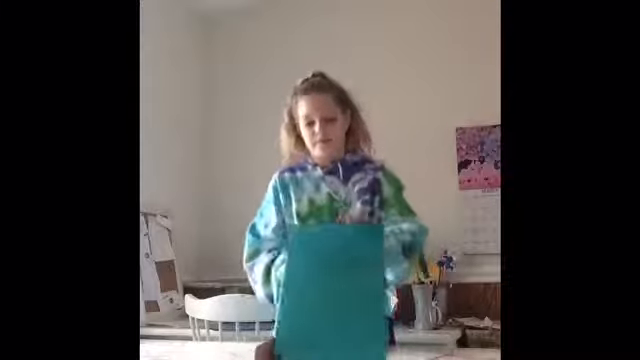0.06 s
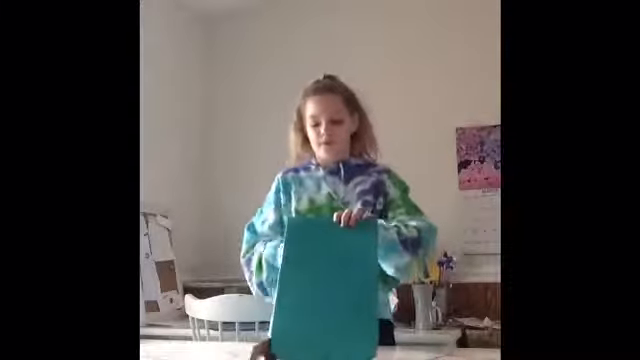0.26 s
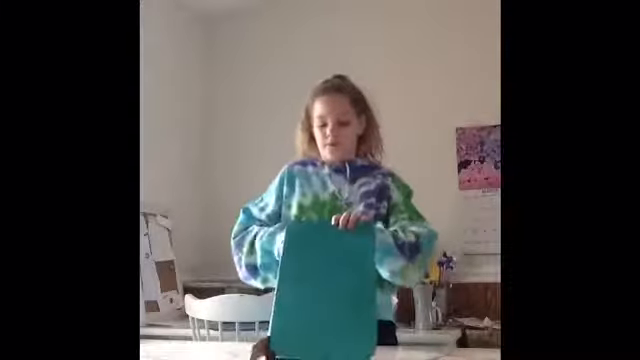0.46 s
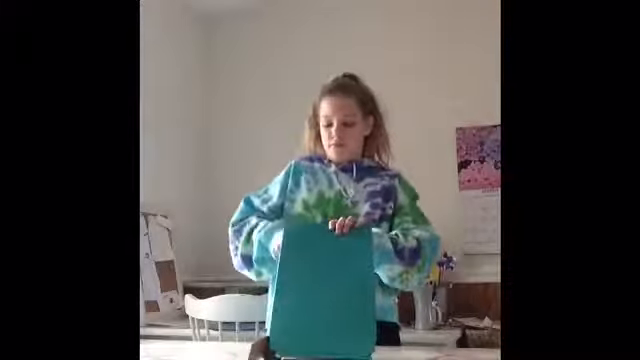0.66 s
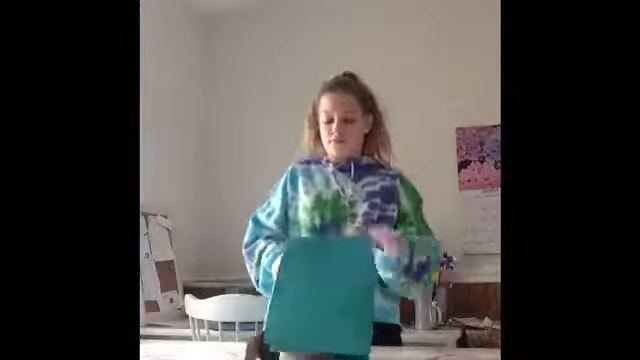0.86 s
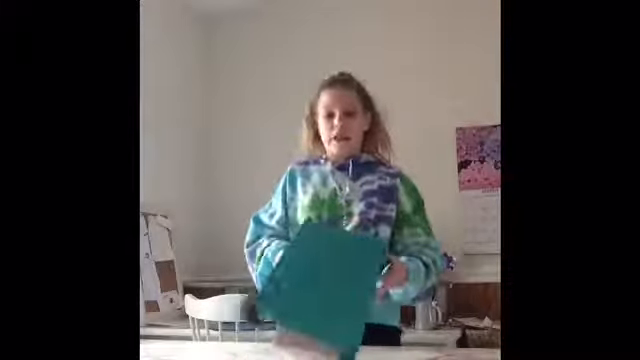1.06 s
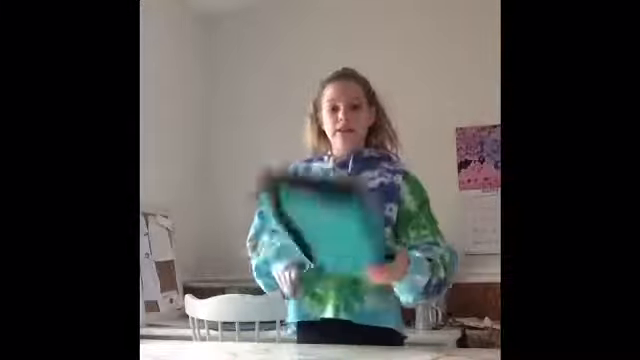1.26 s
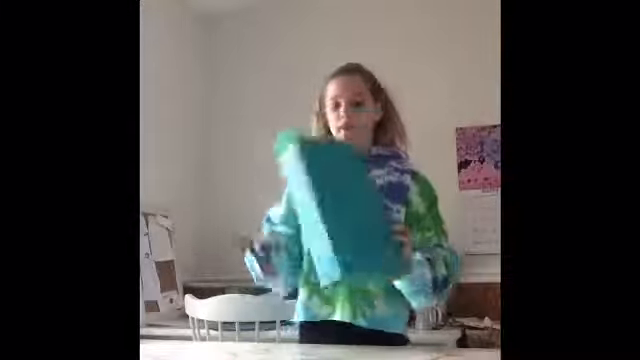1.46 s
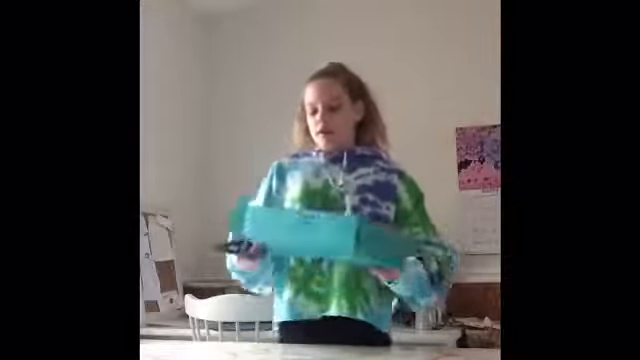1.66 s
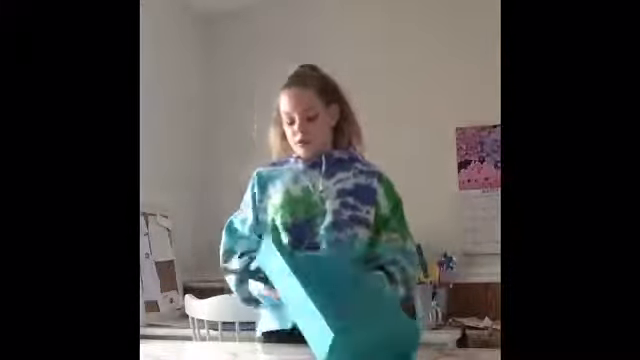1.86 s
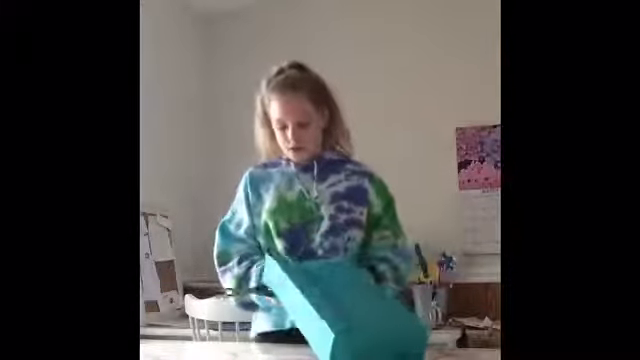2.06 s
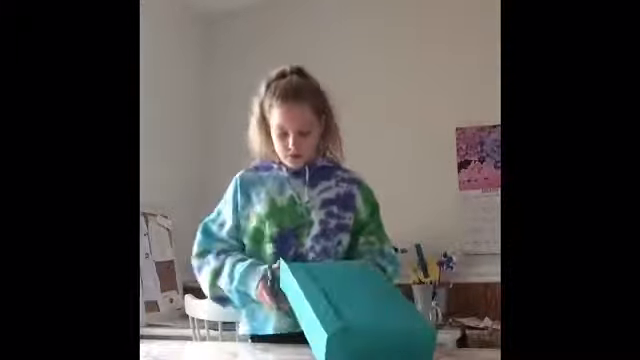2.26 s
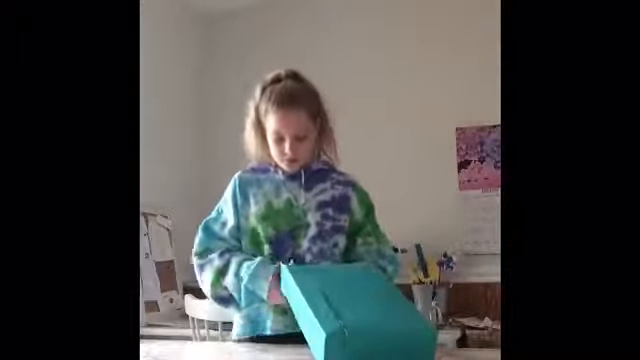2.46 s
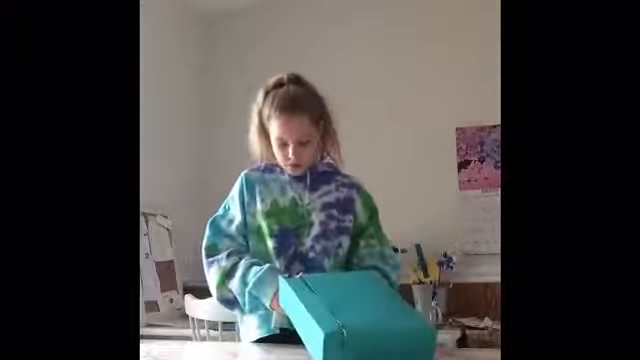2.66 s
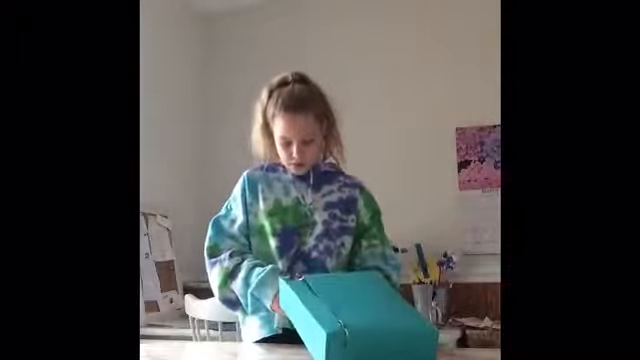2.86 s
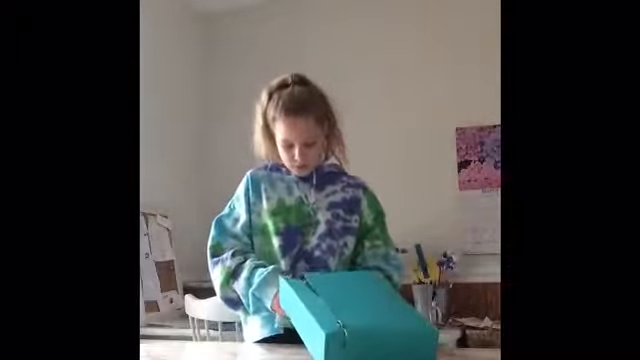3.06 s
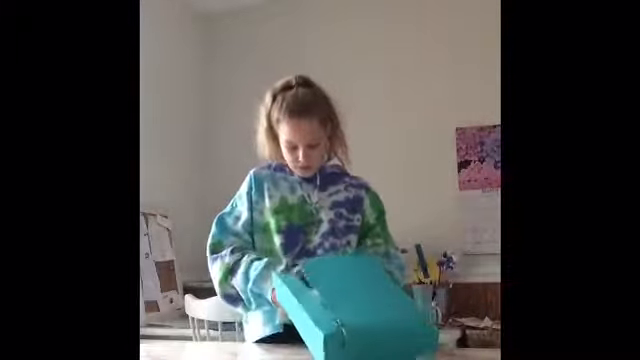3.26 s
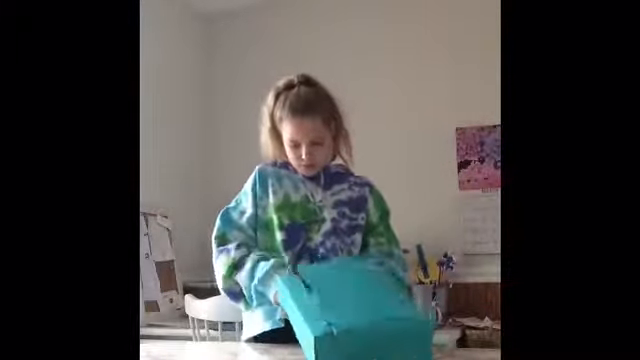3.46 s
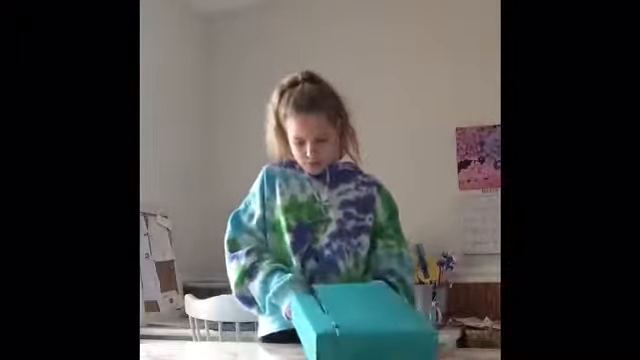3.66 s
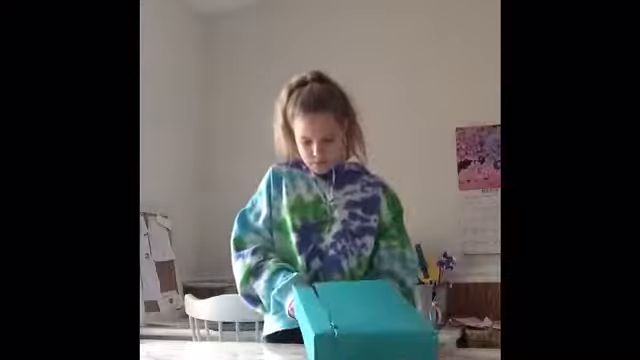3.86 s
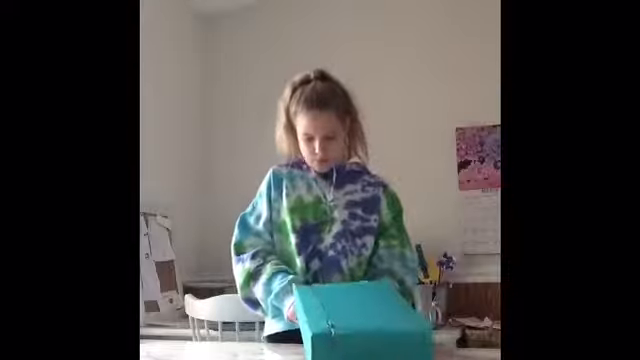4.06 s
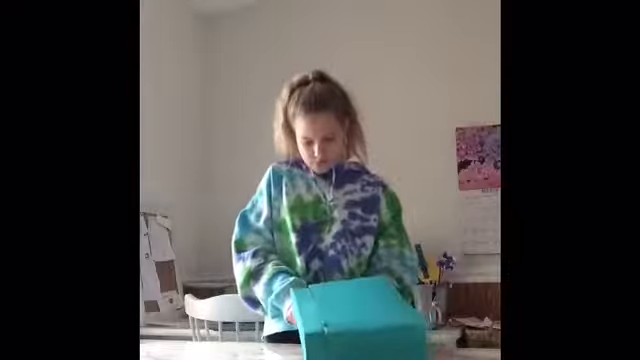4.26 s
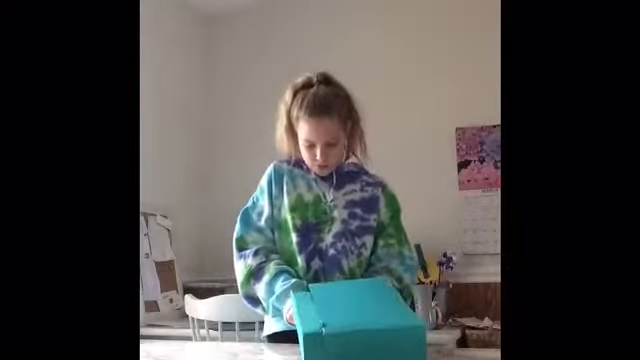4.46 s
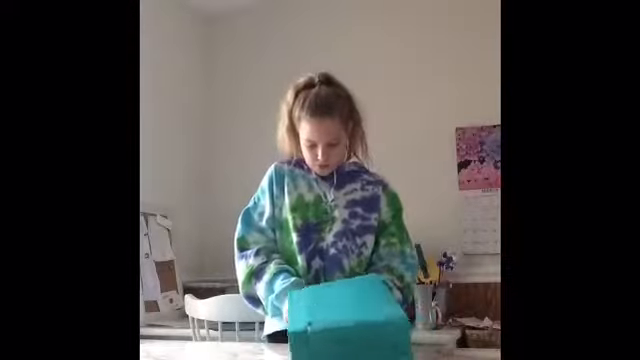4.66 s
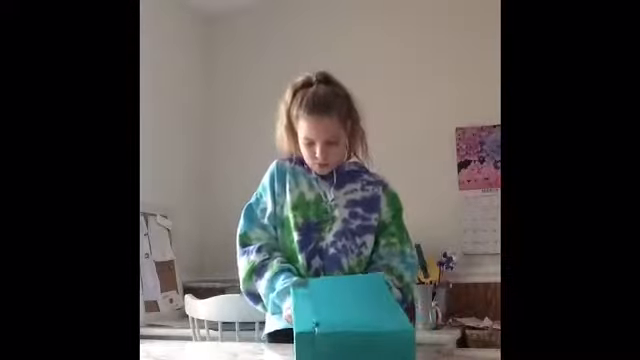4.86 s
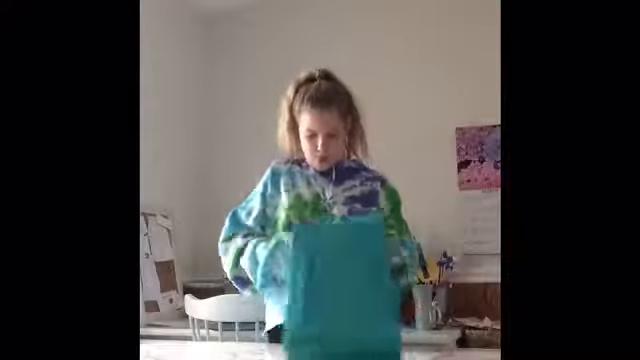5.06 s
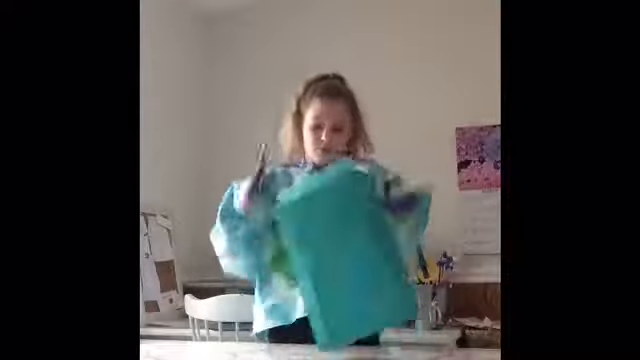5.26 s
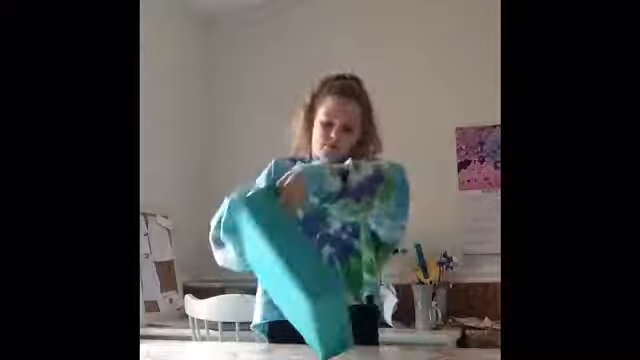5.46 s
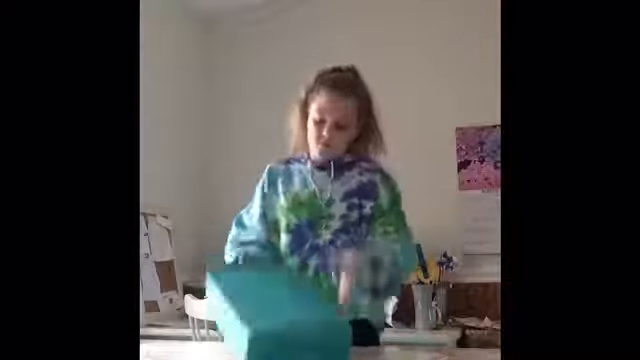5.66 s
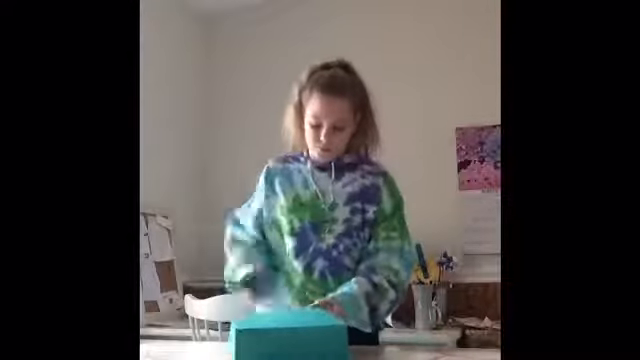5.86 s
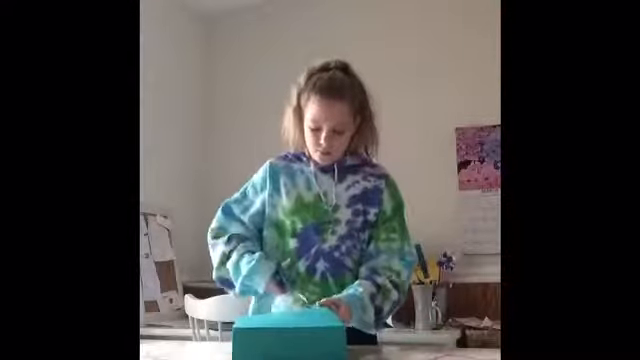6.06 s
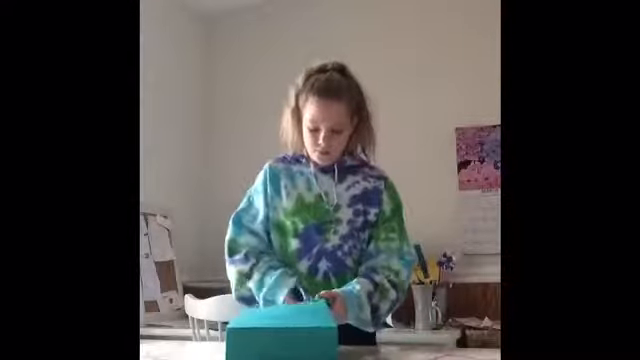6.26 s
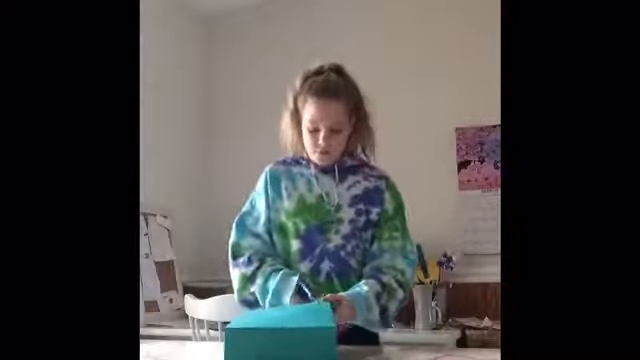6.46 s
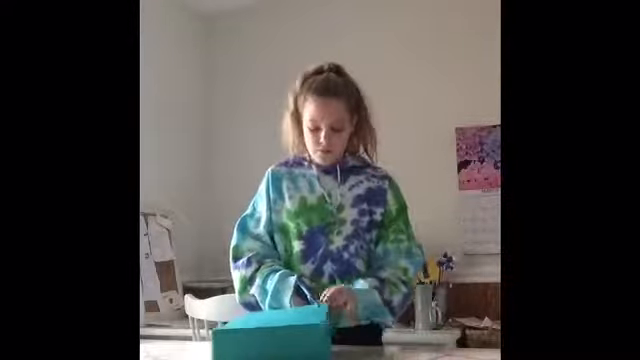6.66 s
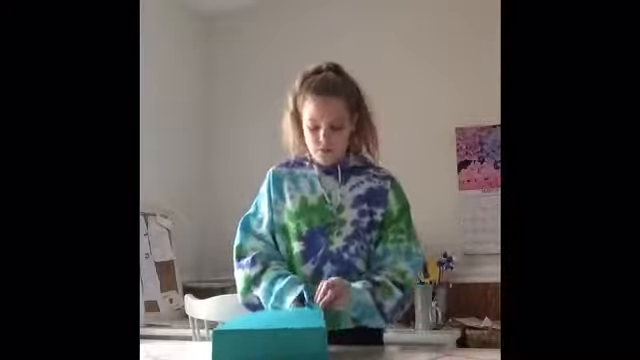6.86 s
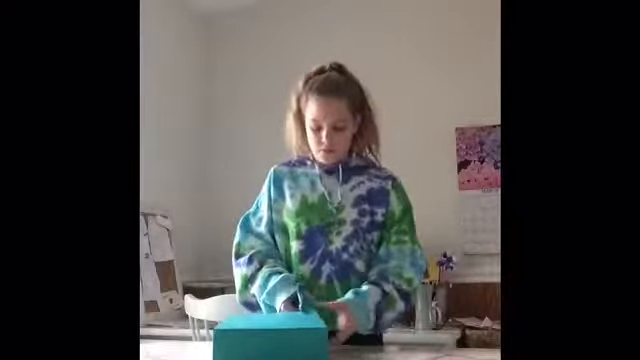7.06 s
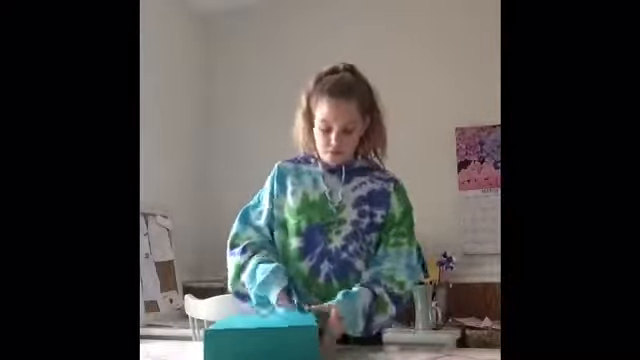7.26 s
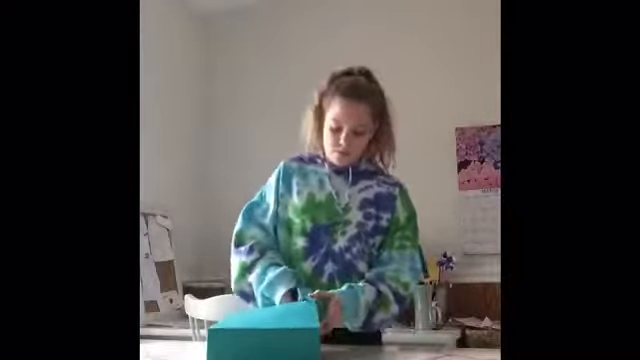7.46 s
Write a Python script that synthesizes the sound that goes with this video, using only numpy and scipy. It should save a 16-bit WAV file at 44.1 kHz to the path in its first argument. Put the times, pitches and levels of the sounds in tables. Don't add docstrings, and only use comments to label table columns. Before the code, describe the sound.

A thin cardboard box is knocked, scuffed and turned on a table, with one loud slap early and faint blade rings over low hum.

```python
import sys
import numpy as np
from scipy import signal
from scipy.fft import rfft, irfft, next_fast_len
from scipy.io import wavfile

SR = 44100
rng = np.random.default_rng(int(sys.argv[2]) if len(sys.argv) > 2 else 0)


def transcribe(signal):
    frames = np.atleast_2d(signal).T
    limited = np.clip(frames, -1, 1)
    pcm = np.round(limited * 32767).astype(np.int16)
    wavfile.write(sys.argv[1], SR, pcm)


def linear_from_db(decibels):
    return 10 ** (np.asarray(decibels, float) / 20)


N = 331191

# frequency in Hz, level in dB, t60 in seconds.
AIR_MODES = [(256.7, 1, 0.048), (283.4, -1.5, 0.12), (356, -12, 0.11), (419.9, -4.5, 0.1),
             (516.3, -13, 0.13), (724.4, -10, 0.11)]
# frequency in Hz, level in dB, t60 in seconds.
PANEL_MODES = [(710.7, -6.5, 0.34), (893, -4, 0.08), (955, -17.5, 0.054), (1120, -2.5, 0.071),
               (1280, -27.5, 0.61), (1322, -4, 0.024), (1340, -17, 0.0637), (1373, -20, 0.69),
               (1632, -4, 0.034), (1638, -7.5, 0.1143), (1770, -1.5, 0.075), (2200, -42.5, 0.122),
               (2116, -10.5, 0.037), (2650, -6.5, 0.042)]
# frequency in Hz, level in dB, t60 in seconds.
EDGE_MODES = [(3150, 8, 0.063), (3600, 5.5, 0.2), (3840, 13, 0.033), (4090, 15, 0.032), (3997, -10, 0.19),
              (4410, -13.5, 0.2), (5845, -39, 0.0642), (6150, -17.5, 0.093)]


def knocks():
    # start in seconds, blow in dB, loudest panel in Hz,
    # edge in dB and crack in dB, both relative to the blow.
    snips = [(0.39, -30, 1594, -2, -5), (0.716, -45, 1760, 7.5, 6), (0.804, -52, 1790, 6, -15),
             (0.982, -47.5, 1140, -1, -24), (1.102, -52.5, 1460, -13, 13.5), (1.617, -48, 2670, 26, 5),
             (1.9033, -10.5, 1280, 6.5, -7.5), (2.543, -43, 934, 3.5, -1), (4.074, -43, 980, -8, -20),
             (4.085, -19.5, 1074, -12, -15), (4.356, -46, 1760, -9, -3), (4.3698, -41, 1540, 13.5, 6),
             (4.576, -47, 1770, 9, -18), (4.744, -42, 1690, -3, -30), (4.925, -49.5, 915, 14.5, -14),
             (5.026, -32.5, 1120, -4, -18), (5.374, -37.5, 1173, -3, -32), (5.443, -56.5, 711, -12, 9),
             (5.484, -39.5, 1230, 4.5, -13), (5.557, -46, 1750, 11, -12), (6.045, -39, 880, 8.5, -6),
             (6.596, -44, 880, 8, -21), (7.035, -43, 1590, 8, -8), (7.305, -42.5, 920, 11.5, -9)]
    # start in seconds, blow in dB, loudest panel in Hz,
    # box air in dB relative to the blow.
    slaps = [(0.885, -42.5, 1340, -8), (1.016, -43, 550, -2), (1.142, -59, 1590, 4),
             (1.306, -35.5, 1820, -16), (1.498, -48, 1330, -31), (1.605, -31, 1690, -9),
             (1.895, -18.5, 1096, -2), (1.91, -9.5, 1120, -13.5), (2.212, -45, 1730, -16),
             (2.216, -46, 2660, -14), (2.331, -41, 750, -8.5), (2.41, -53, 2130, -19),
             (5.28, -46.5, 1090, -10), (5.722, -23, 847, -10), (6.749, -38, 890, -6),
             (7.467, -40.5, 855, -23)]
    # start in seconds, blow in dB, loudest panel in Hz,
    # box air in dB relative to the blow.
    pops = [(0.123, -38, 1513, -11), (0.141, -33, 2450, -9), (0.406, -32, 1530, -11.5),
            (0.492, -44.5, 1780, -8), (2.278, -37, 1385, -22), (2.277, -53, 2500, -24.5),
            (2.666, -47, 1038, -14.5), (3.571, -37, 1188, -3.5), (4.24, -51.5, 600, 0),
            (4.6016, -25.5, 755, -8.5), (4.785, -26, 780, -9.5), (5.001, -33, 1740, -3.5),
            (5.075, -27, 1095, -18), (5.804, -43.5, 860, -9), (6.861, -42, 1486, -12.5)]
    snip_air_db = -16.5
    slap_edge_db, slap_crack_db = -14.5, -29
    pop_edge_db, pop_crack_db = -33, -16
    blows = [(s, db, hz, snip_air_db, edge, crack) for s, db, hz, edge, crack in snips]
    blows += [(*row, slap_edge_db, slap_crack_db) for row in slaps]
    blows += [(*row, pop_edge_db, pop_crack_db) for row in pops]

    t, out = np.arange(12000) / SR, np.zeros(N + 12000)
    held = 1 / (1 + (t / 0.05) ** 4)
    luck = rng.standard_normal((len(blows), 3, 48))
    for (s, blow_db, hz, air_db, edge_db, crack_db), u in zip(blows, luck):
        x = linear_from_db(-3.5) * ring(PANEL_MODES, t, u[0], 4.1, 0.00051, hz)
        x += linear_from_db(-4.5) * burst(t, 0.63 * hz, 1.56 * hz, 0.077) * (1 - np.exp(-t / 0.00061))
        x += linear_from_db(-7.5) * burst(t, 250, 1960, 0.18)
        x += 0.7 * np.sin(2.6 * np.pi * hz * t) * np.exp(-t * hz / 1.4)
        x += linear_from_db(-8.0) * np.sin(2 * np.pi * hz * t) * linear_from_db(-60 * t / 0.071) * (1 - np.exp(-t / 0.0014))
        x += linear_from_db(air_db + 3) * held * ring(AIR_MODES, t, u[1], 1.5, 0.022)
        folds = linear_from_db(-13.5) * ring(EDGE_MODES, t, u[2], 2.8, 0.00046)
        folds += linear_from_db(-9.0) * burst(t, 1300, 5580, 0.12)
        x += linear_from_db(edge_db) * folds
        crack = 0.9 * burst(t, 7000, 15800, 0.012)
        crack += 0.34 * burst(t, 4500, 11000, 0.17)
        crack += 0.2 * np.diff(burst(t, 9000, 15800, 0.08), prepend=0)
        x += linear_from_db(crack_db) * crack
        out[round(s * SR):][:len(t)] += linear_from_db(blow_db) * x
    return out[:N]


def ring(modes, t, luck, spread_db, rise, near_hz=None):
    hz, db, t60 = np.transpose(modes)[:, :, None]
    t60 = np.minimum(t60, 0.15)
    strength, detune, phase = luck[:3 * len(modes)].reshape(3, -1, 1)
    if near_hz:
        db = db - 9 * abs(np.log2(hz / near_hz))
    wave = np.sin(2 * np.pi * (hz * (1 + 0.018 * detune) * t + phase))
    x = (linear_from_db(db + spread_db * strength - 60 * t / t60) * wave).sum(0)
    x = x * (1 - np.exp(-(t / rise) ** 2))
    return x / abs(x).max()


def burst(t, lo_hz, hi_hz, t60):
    x = band(rng.standard_normal(len(t)), lo_hz, hi_hz) * linear_from_db(-60 * t / t60)
    return x / abs(x).max()


def thumps():
    # start in seconds, peak in dB, frequency in Hz, t60 in seconds.
    bumps = [(0.135, -39.5, 244, 0.1), (0.693, -54, 113, 0.29), (0.862, -44, 127.5, 0.27),
             (.806, -49.5, 290, 0.17), (.862, -48, 288, 0.11), (1.018, -46, 290, .1),
             (1.011, -53, 126, 0.28), (1.144, -47, 213, 0.054), (1.613, -46, 136, 0.22),
             (1.895, -31.5, 204, 0.37), (4.085, -56, 201, 0.35), (4.091, -42, 288.6, 0.17),
             (5.491, -33.5, 274, 0.13), (5.5, -44, 418.6, 0.23), (5.009, -47, 216, 0.14),
             (5.485, -29, 214.4, 0.2), (5.558, -45, 190, 0.1), (5.721, -33, 213.5, 0.15),
             (5.828, -52, 136, 0.19), (6.483, -65, 130, 0.2), (6.592, -55, 126.5, 0.24),
             (7.303, -46.5, 244, 0.082), (7.463, -41.5, 240, 0.089)]
    t, out = np.arange(12000) / SR, np.zeros(N + 12000)
    for s, db, hz, t60 in bumps:
        push = np.sin(2 * np.pi * hz * t) * linear_from_db(-60 * t / t60) * (1 - np.exp(-(t / 0.0045) ** 2))
        push = push / abs(push).max()
        push += linear_from_db(-2.0) * burst(t, 124, 253, t60) * np.minimum(t / 0.0028, 1)
        out[round(s * SR):][:len(t)] += linear_from_db(db) * push
    return out[:N]


def ticks():
    # start in seconds, peak in dB, frequency
    # in Hz, t60 in seconds.
    card_ticks = [(.0697, -50, 2560, .03), (0.195, -44, 1800, 0.036), (.194, -42, 900, .08),
                  (0.141, -29, 2570, 0.025), (.535, -50, 1600, .03), (.66, -55, 1090, .04),
                  (0.752, -50, 2550, .03), (1.182, -51, 1730, .03), (1.275, -39, 1690, .04),
                  (1.285, -43, 3750, .04), (1.296, -39, 1800, .03), (1.307, -31.5, 1780, 0.022),
                  (1.307, -45, 3900, .03), (1.317, -45, 1800, .01), (1.378, -37, 1800, .012),
                  (2.279, -34, 1700, .008), (2.667, -48, 1490, 0.013), (5, -37, 1790, .015),
                  (5.024, -33, 1150, .06), (5.034, -34, 1190, .05), (5.036, -37.5, 2880, .03),
                  (5.051, -43, 2580, .05), (5.075, -24, 1700, .006), (5.077, -38, 2640, .05),
                  (5.102, -38, 1280, .04), (5.115, -47, 5180, .04), (5.121, -43, 2900, .015),
                  (5.126, -45, 2320, 0.069), (5.3742, -26.5, 1980, .006), (6.056, -41.5, 957, 0.075),
                  (6.059, -42, 3020, 0.018), (6.218, -42, 1900, .02), (6.32, -47.5, 1070, 0.063),
                  (6.4165, -53, 1860, .03), (6.454, -52, 1800, 0.034), (6.512, -51, 1700, .02),
                  (6.565, -58, 904, 0.027), (6.718, -46, 3500, .02), (6.746, -42, 3600, .015),
                  (6.8214, -36.5, 1720, 0.012), (6.837, -37, 2600, .006), (6.841, -34, 1800, .006),
                  (6.852, -39, 1750, 0.014), (6.8605, -34, 1500, 0.009), (6.871, -38, 1290, 0.0091),
                  (7.0352, -39, 2010, .008),
                  (.124, -38, 1550, 0.027), (.391, -32, 1582, .05), (0.407, -36, 1600, .01),
                   (.887, -47, 2200, .02), (1.428, -49, 1510, 0.011), (1.498, -47, 1900, .012),
                   (1.535, -46, 1500, .015), (1.6209, -25.5, 2540, 0.014), (1.622, -36, 2536, 0.093),
                   (1.717, -50, 1190, .02), (1.81, -53, 1100, .02), (2.096, -50, 1140, 0.018),
                   (2.168, -48, 888, 0.026), (2.184, -44, 1092, 0.064), (2.213, -41, 1800, .03),
                   (2.213, -43, 2700, .03), (2.279, -49.5, 2600, 0.035), (2.411, -53, 1900, .012),
                   (2.548, -52, 3680, 0.049), (2.968, -59.5, 1180, 0.019), (3.106, -60, 703, .03),
                   (3.127, -57, 1750, 0.017), (4.236, -49, 1900, .015), (4.37, -38.5, 3460, .04),
                   (4.578, -46, 1770, .03), (4.786, -24.5, 1780, 0.0087), (5.282, -43, 1500, .01),
                   (5.326, -44, 1105, .015), (5.374, -38.5, 1190, .05), (5.385, -44, 2630, 0.041),
                   (5.485, -47, 4250, 0.017), (5.556, -43, 3380, 0.045), (5.569, -37.5, 1755, 0.023),
                   (5.67, -48, 3300, .012), (5.827, -45, 3030, .01), (6.739, -46, 3460, .02),
                   (6.756, -43, 1010, 0.036), (.165, -43, 900, 0.077), (.805, -53, 3890, .04),
                   (.823, -51, 2600, .015), (.983, -44, 2400, .006), (1.102, -50, 5600, .03),
                   (7.176, -57, 3700, .04), (7.504, -40, 1500, .012), (3.2, -60, 1500, 0.017),
                   (3.33, -60, 1710, .015)]
    t, out = np.arange(4000) / SR, np.zeros(N + 4000)
    for s, db, hz, t60 in card_ticks:
        wave = np.sin(2 * np.pi * hz * t)
        wave += linear_from_db(-10.0) * np.sin(2 * np.pi * 1.58 * hz * t) * linear_from_db(-60 * t / t60)
        out[round(s * SR):][:len(t)] -= linear_from_db(db - 60 * t / t60) * wave * (1 - np.exp(-t * hz / 0.41))
    return out[:N]


def rubbing():
    # time in seconds, pressure in dB, speed in dB.
    strokes = [(0.0, -55, -2), (0.65, -58, -7.5), (0.98, -63, -1), (1.99, -62, 4.5), (2.11, -58, -5),
               (2.8, -73.5, -2.5), (3.24, -74.5, -2.5), (3.79, -63.5, -2.5), (4.04, -67.5, -1.5),
               (4.91, -62, -6), (5.29, -59.5, -9), (5.69, -54, -11), (5.83, -73.5, 10.5),
               (6.09, -60, -14.5), (6.21, -63, 1), (7.01, -70.5, 5), (7.26, -58.5, -6.5), (7.51, -51, -2.5)]
    # start in seconds, length in seconds,
    # panel in dB, loudest panel in Hz, hiss in dB relative to the panel.
    crunches = [(0.723, 0.072, -50, 1100, -14), (1.021, 0.034, -45, 1140, -16.5),
                (1.26, 0.11, -42, 1800, -10), (1.348, 0.067, -44, 1830, -8), (1.48, 0.14, -62, 1240, -15),
                (1.612, 0.041, -34.5, 2600, -7), (1.723, 0.096, -57.5, 1710, -25),
                (2.17, 0.11, -46, 980, -11.5), (2.558, 0.11, -54, 2380, -6.5),
                (4.172, 0.092, -56.5, 745, -8), (4.928, 0.047, -49.5, 2650, -13),
                (5.02, 0.066, -40, 1180, -13), (5.076, 0.11, -48, 2520, -11), (5.528, 0.1, -49, 1800, -9.5),
                (5.614, 0.073, -54, 1280, -14), (5.814, 0.087, -49, 940, -9.5),
                (6.087, 0.053, -51, 960, -14.5), (6.128, 0.099, -47, 960, -13.5),
                (6.482, 0.064, -52.5, 1770, -12), (6.734, 0.054, -45.5, 1020, -11),
                (6.992, 0.086, -57, 1520, -7.5), (7.391, 0.07, -44.5, 1030, -13.5)]
    # start in seconds, length in seconds, panel in dB,
    # loudest panel in Hz, hiss in dB relative to the panel.
    brushes = [(0.122, 0.15, -44.5, 840, -27), (0.346, 0.047, -54.5, 775, -3), (0.4, 0.089, -43, 1470, -16),
               (0.534, 0.093, -49, 1720, -14.5), (0.804, 0.12, -51.5, 2480, -11.5),
               (1.098, 0.03, -73, 1530, 8), (2.642, 0.16, -64, 1040, -10.5), (3.713, 0.078, -48, 1415, -19),
               (3.776, 0.048, -48, 1870, -15.5), (3.827, 0.05, -51, 1540, -11.5),
               (3.94, 0.083, -52, 2320, -15.5), (4.328, 0.028, -54, 1808, -9),
               (4.406, 0.015, -47, 2400, -11), (4.421, 0.11, -45.5, 2470, -17),
               (4.587, 0.086, -49.5, 745, -6.5), (4.744, 0.086, -51, 1680, -25),
               (4.785, 0.088, -43.5, 1870, -17.5), (5.268, 0.083, -49.5, 770, -15),
               (0.0, 0.27, -66.5, 2480, 9), (6.265, 0.22, -53, 930, -16.5), (6.552, 0.059, -53, 830, -32),
               (7.198, 0.21, -56, 910, -14), (7.297, 0.072, -44, 950, -12), (7.475, 0.058, -46, 930, -18),
               (6.709, 0.04, -55, 1010, -2.5), (7.059, 0.15, -62, 3700, -7.5),
               (6.929, 0.094, -60.5, 3300, -6), (4.183, 0.035, -59, 2600, -12),
               (4.579, .03, -48, 1750, -10.5)]
    # start in seconds, length in seconds,
    # panel in dB, loudest panel in Hz, hiss in dB relative to the panel.
    tears = [
        (4.994, 0.033, -45.5, 1900, -10),
        (6.7, 0.04, -43, 930, -17),
        (6.213, 0.075, -43, 1070, -10.5),
        (6.83, 0.11, -43, 1490, -16),
        (4.9, .035, -51, 1080, -14),
        (6.782, 0.069, -54, 2500, -20),
        (1.3, 0.11, -53, 1210, -15),
    ]
    crunch_skin_db, brush_skin_db = -9.5, -51
    air_share, rest_db = 0.468, -64.5

    air, panel, skin, hiss = fibres(0.5)
    pressure_db, speed_db = follow(strokes)
    out = linear_from_db(-68 + air_share * (pressure_db - rest_db)) * air
    out += linear_from_db(pressure_db - 9) * panel
    out += linear_from_db(pressure_db + speed_db) * (linear_from_db(-13.5) * skin + linear_from_db(-6.5) * hiss)

    scuffs = [(*row, crunch_skin_db, 0.8) for row in crunches]
    scuffs += [(*row, brush_skin_db, 0.8) for row in brushes]
    scuffs += [(*row, crunch_skin_db, 0.4) for row in tears]
    air, panel, skin, hiss = fibres(0.55)
    lowest, highest = np.log([2550, 3500, 5000]), np.log([2900, 3950, 12000])
    flutes_hz = np.exp(rng.uniform(lowest, highest, (len(scuffs), 3)))
    for (s, length, db, hz, hiss_db, skin_db, lean), (low, mid, high) in zip(scuffs, flutes_hz):
        part = slice(max(round((s - 0.008) * SR), 0), round((s + length) * SR))
        body = 0.7 * panel[part] + 0.6 * evened(resonate(panel[part], hz, 0.09 * hz))
        body += linear_from_db(-6.0) * air[part]
        flutes = sum(evened(resonate(skin[part], f, 0.035 * f)) for f in (low, mid))
        rasp = 0.7 * skin[part] + 0.55 * flutes
        fizz = 0.9 * hiss[part] + 0.2 * evened(resonate(hiss[part], high, 0.04 * high))
        scuff = body + linear_from_db(skin_db + 1.0) * rasp + linear_from_db(hiss_db + 8.0) * fizz
        out[part] += linear_from_db(db - 7.5) * swell(len(body), lean) * scuff
    return out


def fibres(grit):
    # frequency in Hz, density in dB per Hz.
    skin_colour = [(47, -66), (80, -48.5), (112, 6), (178, -13.5), (283, 0.5), (338, -7), (687, -3),
                   (802, -5), (1070, -2), (2600, -2.5), (5640, -17), (14600, -35.5), (16000, -21.5)]
    clumps = linear_from_db(3.6 * evened(band(rng.standard_normal(N), 10, 81)))
    snaps = np.zeros(N)
    for hz in np.geomspace(500, 14000, 24):
        t = np.arange(round(32 * SR / hz)) / SR
        struck = rng.exponential(1, N)
        size = linear_from_db(4 * np.minimum(struck, 3.5)) * (rng.random(N) < 60 * clumps / SR)
        grain = np.sin(2 * np.pi * hz * t) * t * hz * np.exp(-t * hz / 3)
        snaps += hz ** 0.7 * signal.oaconvolve(size, grain)[:N]
    drive = grit * evened(snaps) + rng.standard_normal(N) * clumps ** 0.38
    box = evened(sum(linear_from_db(db) * resonate(drive, hz, 4 / t60) for hz, db, t60 in AIR_MODES + PANEL_MODES))
    box += linear_from_db(-8.0) * evened(resonate(drive, 3460, 630))
    folds = sum(linear_from_db(0.5 * db) * resonate(drive, hz, 5 / t60) for hz, db, t60 in EDGE_MODES)
    box += linear_from_db(-14.5) * evened(folds)
    return split(evened(coloured(drive, skin_colour)) + linear_from_db(-3) * evened(box))


def split(x):
    borders_hz = 550, 2800, 6500
    size = next_fast_len(len(x))
    hz, z = np.fft.rfftfreq(size, 1 / SR), rfft(x, size)
    above = [np.ones_like(hz)]
    above += [1 / (1 + (c / (hz + 1)) ** 6) for c in borders_hz]
    above += [0 * hz]
    return [evened(irfft(z * np.sqrt(a - b), size)[:len(x)]) for a, b in zip(above, above[1:])]


def swell(length, lean=0.61):
    return np.sin(np.pi * np.linspace(0, 1, length) ** lean).clip(0) ** 1.5


def blades():
    # start in seconds, length in seconds, frequency in Hz, level in dB.
    grinds = [
        (3.706, 0.11, 8450, -65.5),
        (3.71, 0.074, 11100, -73),
        (3.783, .05, 8360, -71),
        (3.823, 0.051, 8500, -70),
        (3.83, .03, 9550, -73),
        (3.93, 0.05, 8600, -70),
        (4.364, 0.031, 8500, -50),
        (4.429, 0.075, 10600, -60.5),
        (4.745, 0.15, 10600, -62),
        (5.112, 0.035, 5200, -60),
    ]
    # time in seconds, frequency in Hz, level in dB.
    squeak = [
        (7, 15700, -75),
        (7.05, 15000, -69),
        (7.1, 14500, -71),
        (7.17, 13700, -79),
        (7.195, 12900, -69),
        (7.21, 12400, -84),
    ]
    catches = rng.standard_normal(N) * (1 + (rng.random(N) < 250 / SR) * 30)
    hz, db = follow(squeak)
    t = np.arange(N) / SR
    sounding = (t > squeak[0][0]) * (t < squeak[-1][0])
    out = sounding * linear_from_db(db) * evened(resonate(rng.standard_normal(N), hz, 70))
    for s, length, hz, db in grinds:
        part = slice(round(s * SR), round((s + length) * SR))
        steel = resonate(resonate(catches[part], hz, 0.1 * hz), hz, 0.16 * hz)
        out[part] += linear_from_db(db) * swell(len(steel)) * evened(steel)
    return out


def pipe():
    # time in seconds, frequency in Hz, level in dB.
    low_tone = [
        (3.2, 499.6, -84.5),
        (3.25, 498.3, -58.5),
        (3.31, 512, -75),
        (3.4, 500, -60.5),
        (3.46, 500, -80.5),
        (3.68, 494, -74.5),
        (3.86, 492.5, -69),
        (3.92, 502, -88),
    ]
    # time in seconds, frequency in Hz, level in dB.
    high_tone = [
        (3.24, 511, -83.5),
        (3.28, 542.7, -67),
        (3.38, 558, -62),
        (3.5, 559, -70.5),
        (3.68, 559, -67.5),
        (3.8, 558, -69),
        (4.05, 556, -74),
        (4.1, 548.6, -92),
    ]
    out = np.zeros(N)
    for hz, db in (follow(low_tone), follow(high_tone)):
        line = np.sin(2 * np.pi * np.cumsum(hz) / SR)
        out += linear_from_db(db) * (line + 0.64 * evened(resonate(rng.standard_normal(N), hz, 17)))
    return out


def hum():
    # frequency in Hz, density in dB per Hz.
    floor_colour = [(20, -18), (60, -12.5), (95, -9), (135, 2.5), (250, -4.5), (380, -23), (800, -18),
                    (1700, -22.5), (3000, -27.5), (16000, -32.5)]
    return linear_from_db(-62.5) * evened(coloured(rng.standard_normal(N), floor_colour))


def room(x):
    # frequency in Hz, t60 in seconds.
    decay = [(150, 0.33), (500, 0.35), (2000, 0.15), (6000, 0.067), (14000, 0.069)]
    taps = np.zeros(SR // 2)
    at = np.arange(200, len(taps) - 20, 20)
    taps[at + rng.integers(0, 20, len(at))] = rng.choice([-1., 1.], len(at))
    hz, t, z = signal.stft(taps, SR, nperseg=256)
    tail = signal.istft(z * linear_from_db(-60 * t / read(decay, hz)[:, None]), SR, nperseg=256)[1]
    return signal.fftconvolve(x, tail / np.linalg.norm(tail))[:N]


def evened(x):
    return x / np.sqrt(np.mean(x ** 2) + 1e-20)


def read(points, hz):
    f, value = np.transpose(points)
    return np.interp(np.log(hz + 1), np.log(f + 1), value)


def follow(rows):
    s, *columns = np.transpose(rows)
    return [np.interp(np.arange(N) / SR, s, c) for c in columns]


def coloured(x, points):
    size = next_fast_len(len(x))
    return irfft(rfft(x, size) * linear_from_db(read(points, np.fft.rfftfreq(size, 1 / SR))), size)[:len(x)]


def band(x, lo_hz, hi_hz):
    return signal.sosfilt(signal.butter(2, [lo_hz, hi_hz], "band", fs=SR, output="sos"), x)


def resonate(x, hz, width):
    turn = np.exp(2j * np.pi * np.cumsum(hz * np.ones(len(x))) / SR)
    r = np.exp(-np.pi * width / SR)
    return 2 * (turn * signal.lfilter([1 - r], [1, -r], x / turn)).real


def scene():
    box = knocks() + thumps() + ticks() + rubbing()
    return (box + linear_from_db(-18.0) * room(box) + blades() + pipe() + hum())[None]


def roll_off(x):
    return signal.sosfilt(signal.butter(12, 16660, fs=SR, output="sos"), x)


def record(dry):
    heard = signal.sosfilt(signal.butter(2, 55, "high", fs=SR, output="sos"), dry)
    limit = signal.firwin(255, 15950, window=("kaiser", 4), fs=SR)
    heard = signal.oaconvolve(heard, limit[None], "same")
    return roll_off(heard)


dry = scene()
out = record(dry)
transcribe(out)
```